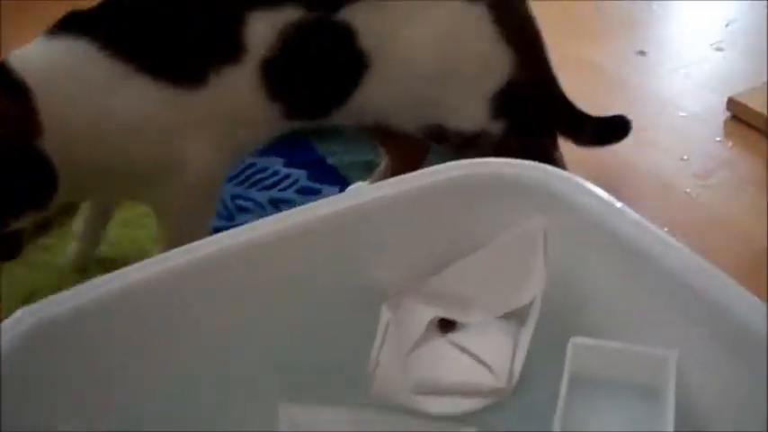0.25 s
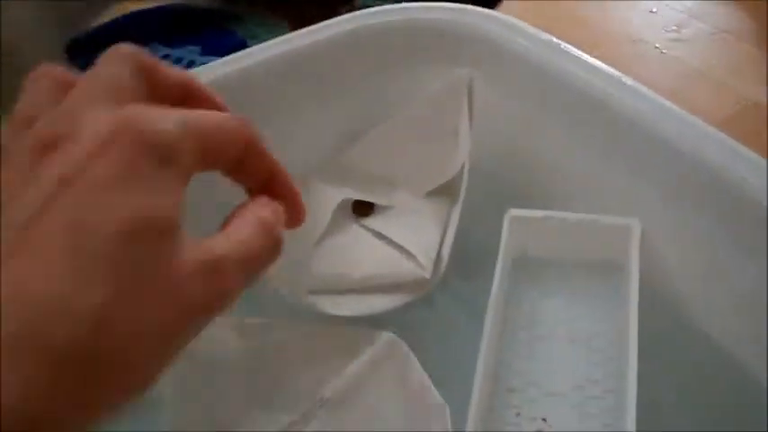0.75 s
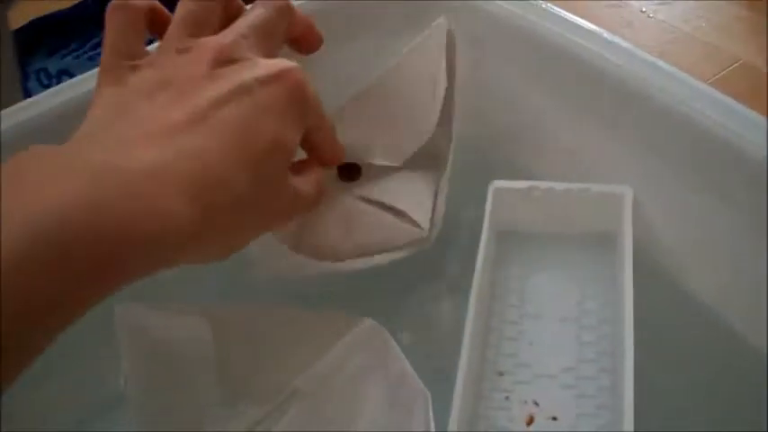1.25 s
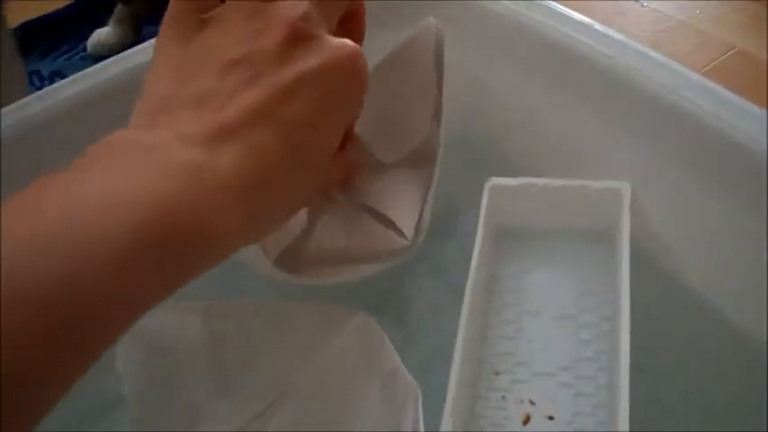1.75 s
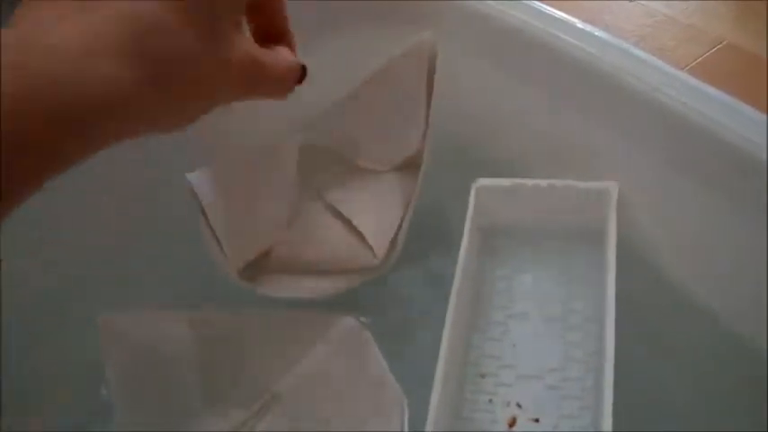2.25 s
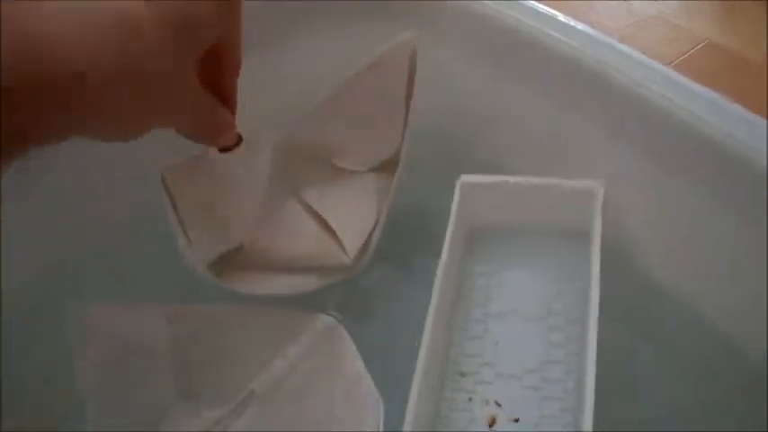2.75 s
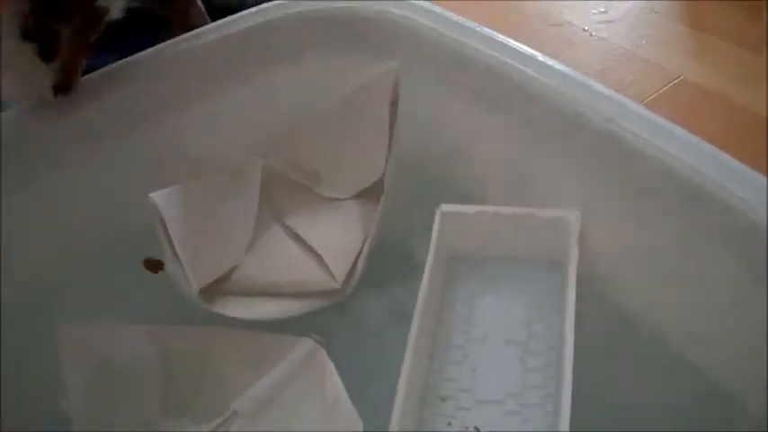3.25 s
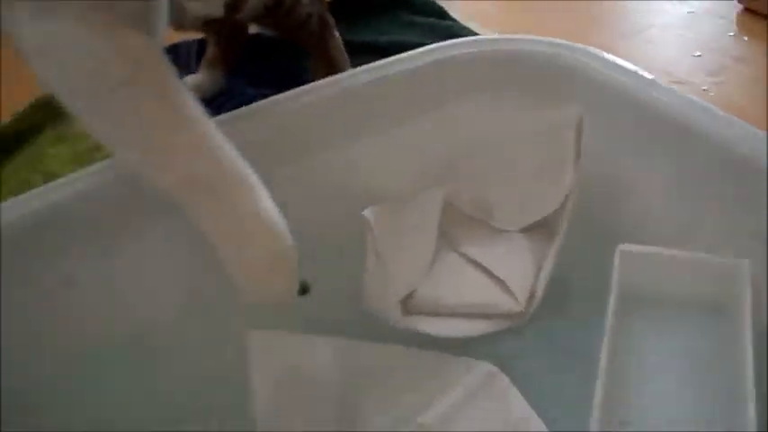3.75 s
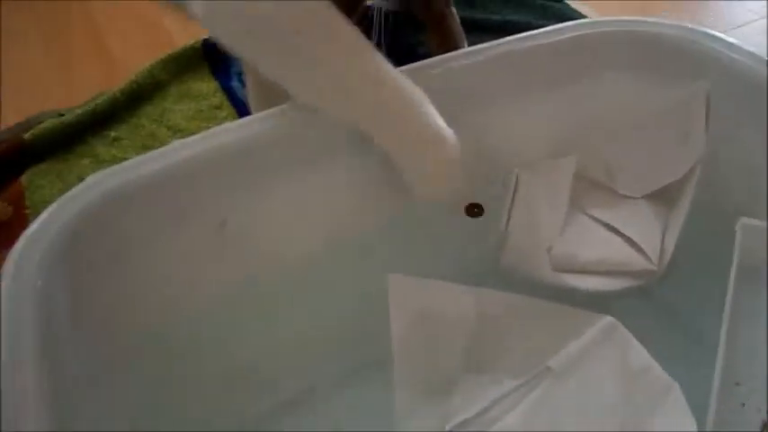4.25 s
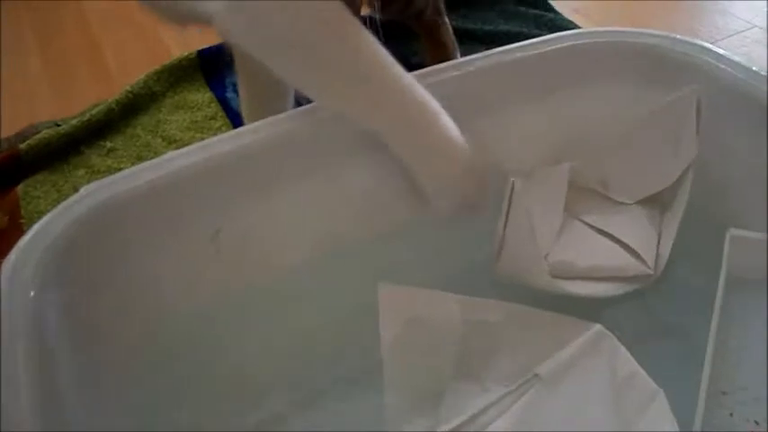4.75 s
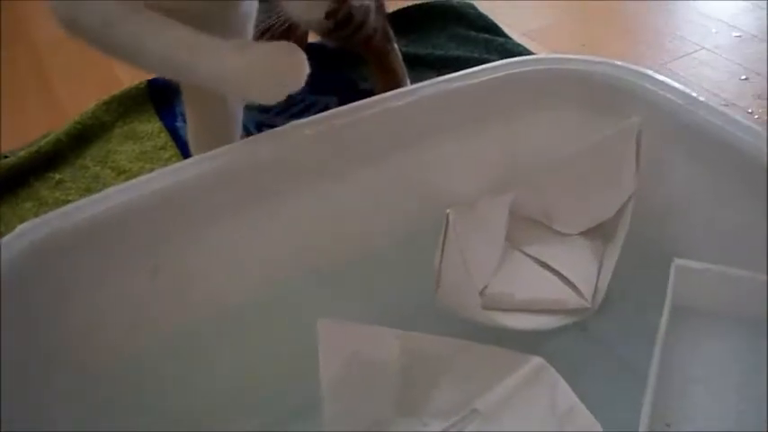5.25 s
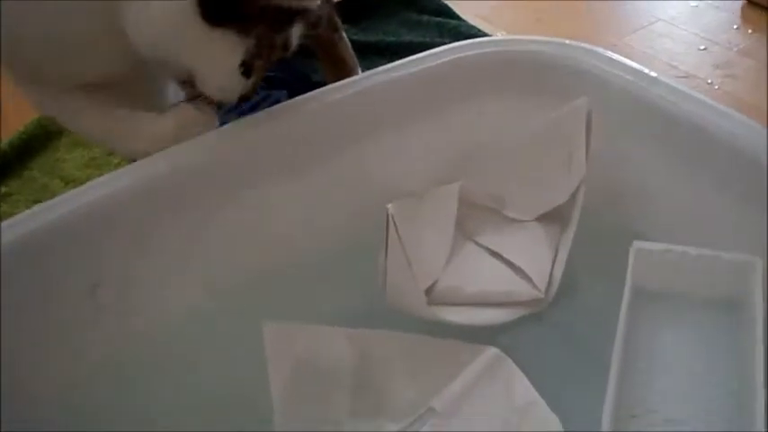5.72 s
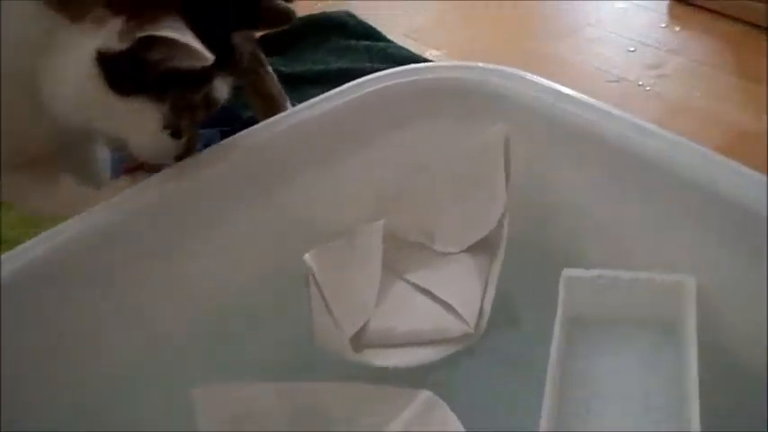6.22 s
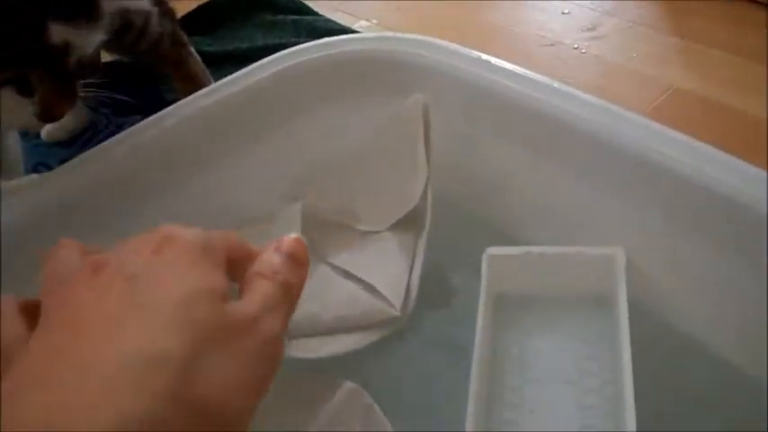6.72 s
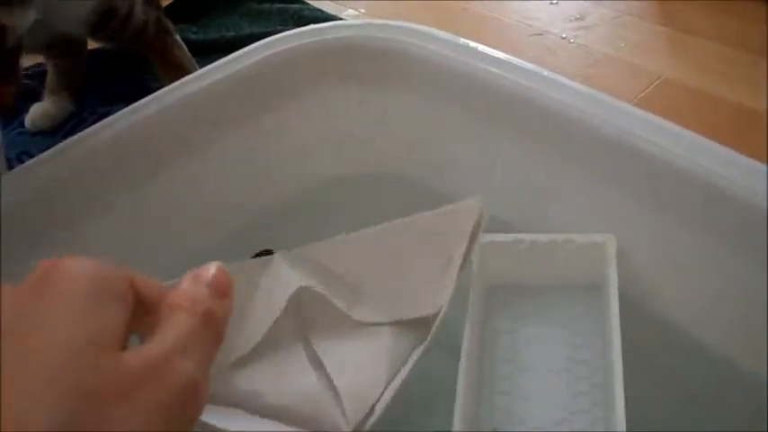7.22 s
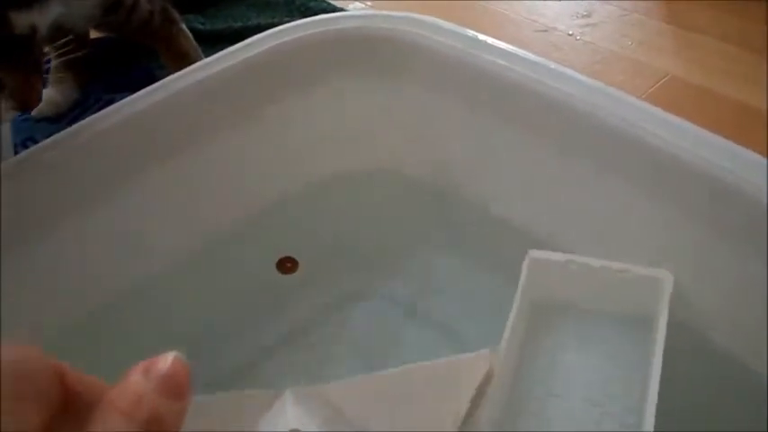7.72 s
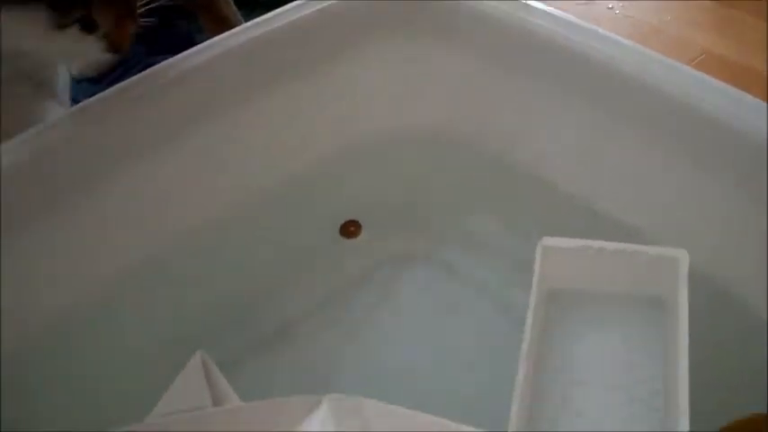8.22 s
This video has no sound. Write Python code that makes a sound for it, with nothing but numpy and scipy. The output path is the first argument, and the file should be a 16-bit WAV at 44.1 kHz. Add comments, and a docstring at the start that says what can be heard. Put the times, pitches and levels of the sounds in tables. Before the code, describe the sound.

A steady low hum and soft ventilation hiss fill a quiet room throughout. From about 0.4 seconds, fingers softly rustle a folded paper boat, with crisp crease snaps loudest between 1 and 1.6 seconds, ending around 2.3. A single sharp click comes at 3.1. From 4 to 5.3 seconds a cat paws at a plastic tub of water: irregular claw clicks, dull thuds of the wall with a slight low boom, and soft scrapes of wet pads on plastic. The loudest hits fall at 4.7 and 4.9 seconds, the first briefly overloading the microphone. Faint dry ticks follow from 5.6 to 6.3, then a sharp tap at 6.6. Light paper rustling returns at 6.7, and from 7.4 to about 8.1 the damp boat is dragged away, rubbing with a few small snaps, leaving the hum.

```python
"""A cat's paw fishes a treat out of a plastic tub of water: claws click on the wall, the wall thuds, the
water booms, and wet pads scrape along the plastic, all through the tub's own modes. A hand rustles a
folded paper boat before and drags it away after: tiny slips and snapping creases ring its folds and hull.
Around the pawing are other small taps and faint dry ticks, over the steady hum of a quiet room.
The loudest claws overload the microphone."""
import sys
import numpy as np
from scipy import signal
from scipy.fft import rfft, irfft
from scipy.io import wavfile
from scipy.ndimage import uniform_filter1d

SR = 44100
rng = np.random.default_rng(int(sys.argv[2]) if len(sys.argv) > 2 else 0)


def unload_wav(signal):
    """Save mono or channel-first audio to the path in sys.argv[1] as 16-bit WAV at rate SR, clipped to [-1, 1]."""
    wavfile.write(
        sys.argv[1],
        SR,
        np.round(np.clip(np.atleast_2d(signal).T, -1, 1) * 32767).astype(np.int16),
    )


N = 373894


def gain_of(db):
    return 10 ** (np.asarray(db) / 20)


def unit_rms(x):
    return x / np.sqrt(np.mean(x ** 2) + 1e-20)


def curve_at(points, hz):
    """Reads an EQ curve on a log frequency axis."""
    point_hz, db = np.transpose(points)
    return np.interp(np.log(hz + 1), np.log(point_hz + 1), db)


def add(mix, start_s, sound):
    part = mix[round(start_s * SR):][:len(sound)]
    part += sound[:len(part)]


def resonate(x, hz, width):
    """A resonance of gain 1: shifts hz down to zero, smooths, and shifts back."""
    carrier = np.exp(2j * np.pi * hz * np.arange(len(x)) / SR)
    pole = np.exp(-np.pi * width / SR)
    return 2 * (carrier * signal.lfilter([1 - pole], [1, -pole], x / carrier)).real


def band(x, hz, width, skirt):
    """A resonance with its skirts trimmed by a second one, skirt times as wide."""
    return resonate(resonate(x, hz, width), hz, skirt * width)


def near(hz, centre_hz, octaves):
    """A bell weight: modes close to the centre are driven hardest."""
    return np.exp(-.5 * (np.log2(hz / centre_hz) / octaves) ** 2)


def wobble(shape, first, second):
    """Slow random modulation: noise smoothed over two spans of samples."""
    return unit_rms(uniform_filter1d(uniform_filter1d(rng.standard_normal(shape), first), second))


def grit(size, per_s, spread_db):
    """Friction as random slips of uneven strength."""
    kicks = rng.standard_normal(size)
    slipping = rng.random(size) < per_s / SR
    strength = gain_of(spread_db * np.minimum(rng.exponential(1, size), 4))
    return unit_rms(kicks * slipping * strength)


def stroke(length, start_db, end_db, attack_s=.0064, release_s=.017):
    """The envelope of a stroke: it sets in, drifts evenly in level and lets go."""
    t = np.arange(0, length, 1 / SR)
    edges = np.minimum(1, np.minimum(t / attack_s, (length - t) / release_s))
    return edges * gain_of(start_db + (end_db - start_db) * t / length)


# ventilation bed: (frequency [Hz], relative level [dB])
AIR_SPECTRUM = [(5, -49), (25, -50.5), (60, -57), (160, -63), (400, -67.5), (800, -70), (1500, -73),
                (2500, -79.5), (5000, -83), (7000, -85), (8000, -87.5), (8500, -91.5), (8900, -112),
                (9500, -130)]
# motor drone: (frequency [Hz], width [Hz], level [dB])
HUM_BANDS = [(104.5, 7.1, -49), (121.3, 8.2, -47), (186.4, 9.4, -53), (244.2, 8.8, -52),
             (259.2, 19.4, -45.5), (299.6, 9.1, -52.5), (359.3, 6.3, -63.5), (588, 7.5, -56.5),
             (924, 67, -56), (1815, 81, -62.5)]


def room_tone():
    """Ventilation air with faint drifting patches, and the wavering hum of a motor."""
    hz = np.fft.rfftfreq(2048, 1 / SR)
    real, imag, patches = rng.standard_normal((N // 512 + 5, len(hz), 3)).T
    patches = unit_rms(uniform_filter1d(uniform_filter1d(patches, 20, axis=0), 6, axis=1))
    air_db = curve_at(AIR_SPECTRUM, hz)[:, None] + 1.31 * patches - 3.5
    spectra = (real + 1j * imag) * gain_of(air_db) * np.sqrt(SR / 2048)
    air = signal.istft(spectra, nperseg=2048, noverlap=1536)[1][:N]
    noise = rng.standard_normal(N)
    hum = sum(gain_of(db) * unit_rms(band(noise, f, width, skirt=2)) for f, width, db in HUM_BANDS)
    return air + hum


# faint dry ticks: (time [s], peak level [dB], pitch [Hz])
DRY_TICKS = [(0.173, -22, 5130), (5.5994, -31, 2880), (5.776, -30, 2380), (5.9787, -28, 3400),
             (6.0273, -31, 2230), (6.0517, -27, 2800), (6.105, -33.5, 6000), (6.1474, -33, 3700),
             (6.2244, -36, 3240), (6.2868, -28, 3780)]


def tick(db, hz):
    """A tiny crack: a few cycles at one pitch over a spread of noise."""
    t = np.arange(300) / SR
    crack = resonate(rng.standard_normal(len(t)), hz=4000, width=4000)
    envelope = gain_of(-60 * t / .0065) * (1 - np.exp(-t / .0003))
    sound = (np.sin(2 * np.pi * hz * t) + crack) * envelope
    return gain_of(db) * sound / abs(sound).max()


# resonances of the folded paper: (frequency [Hz], width [Hz], gain [dB])
PAPER_FOLDS = [(2170, 1080, 0), (3305, 850, -5.5), (3990, 1060, -10), (4820, 1130, -3.5), (5800, 560, 0),
               (6580, 800, -4), (7160, 600, -8), (8690, 950, 5)]


def paper(slips, bright_hz, folds, flex_db):
    """The folded sheet colours whatever shakes it; each fold flexes, so its ring comes and goes."""
    flex = wobble((len(folds), len(slips)), 900, 500)
    drives = gain_of(flex_db * np.clip(flex, -2, 1.5))
    rings = sum(gain_of(db) * band(slips * drive, hz, width, skirt=3) * (near(hz, bright_hz, .45) + .3)
                for (hz, width, db), drive in zip(folds, drives))
    fizz = .058 * np.gradient(slips)
    return rings + fizz


# the boat's hollow body: (frequency [Hz], width [Hz], gain [dB])
HULL_MODES = [(790, 130, -5), (1110, 130, 0)]


def hull(slips):
    """The air in the hull rings low."""
    return sum(gain_of(db) * band(slips, hz, width, skirt=2.5) for hz, width, db in HULL_MODES)


# fingers rubbing paper:
# (time [s], length [s], start level [dB], end level [dB], brightness [Hz], hull against paper [dB])
FINGER_RUBS = [(0.38, 0.088, -48.5, -44, 2700, -9), (0.52, 0.14, -45, -47.5, 3360, -7),
               (0.985, .05, -34, -52, 4770, -8), (1.055, 0.08, -43, -59, 3480, -6),
               (1.17, 0.14, -44, -40.5, 4160, -9.5), (1.32, .085, -39, -32, 5600, -27),
               (1.4, .05, -42, -46, 5400, -12), (1.44, 0.046, -49, -27, 4800, -15),
               (1.485, 0.073, -24, -45, 4470, -12), (1.53, 0.089, -30, -31, 4600, -15.5),
               (1.615, 0.12, -32.5, -37.5, 3900, -24), (1.735, 0.14, -40, -50, 4000, -13),
               (1.88, .18, -49.5, -45.5, 3400, -8), (2.11, 0.14, -37.5, -44.5, 4000, -16),
               (6.742, .04, -40, -62, 2600, -1), (6.81, 0.2, -48.5, -50, 4200, -11),
               (6.995, 0.081, -42, -40, 2870, -18), (7.07, .12, -44, -42.5, 4040, -12),
               (7.25, 0.058, -48, -42.5, 3900, -10)]


def rustle(length, start_db, end_db, bright_hz, hull_db, folds=PAPER_FOLDS, flex_db=4):
    """Dense slips in uneven clumps play through the folds and the hollow hull."""
    envelope = stroke(length, start_db, end_db)
    clumps = gain_of(1.6 * wobble(len(envelope), 300, 200))
    slips = unit_rms(grit(len(envelope), per_s=13000, spread_db=2.5) * clumps)
    crinkle = unit_rms(paper(slips, bright_hz, folds, flex_db))
    return envelope * (crinkle + gain_of(hull_db) * unit_rms(hull(slips)))


# creases popping: (time [s], peak level [dB], brightness [Hz], decay [ms])
CREASE_SNAPS = [(0.971, -32, 3300, 2.3), (0.9802, -11.5, 5750, 3.3), (1.3405, -35, 6240, 2.8),
                (1.389, -16, 5980, 1.9), (1.4476, -25, 5890, 3.0), (1.4872, -5.5, 5800, 1.9),
                (1.4915, -5.5, 4570, 4.3), (1.5612, -23, 5950, 3.7), (1.606, -19, 3400, 5.2),
                (1.6136, -4.5, 4120, 4.1), (1.7389, -29.5, 1900, 4.4), (1.7946, -24, 5200, 4.4),
                (2.162, -18, 4800, 12), (2.2246, -28, 1830, 1.1), (6.978, -23.5, 5260, 2.7),
                (7.4695, -19.5, 4800, 3.2), (7.5577, -28, 2960, 3.0), (7.885, -27.5, 5090, 5.3),
                (7.981, -21.5, 4670, 3.3)]
SNAP_LEAD = 600  # samples of strain before the crease gives


def snap(db, bright_hz, decay_ms, strain_ms=1.3, hull_db=-12):
    """A crease strains, gives way in a clump of slips and settles."""
    ms = np.arange(-SNAP_LEAD, 1400) / SR * 1000
    strain = np.exp(np.minimum(ms / strain_ms, -ms / decay_ms))
    slips = grit(len(ms), per_s=15000, spread_db=4) * strain
    sound = paper(slips, bright_hz, PAPER_FOLDS, flex_db=4) + gain_of(hull_db) * hull(slips)
    return gain_of(db) * sound / abs(sound).max()


# modes of the filled tub: (frequency [Hz], gain [dB], time to fall 60 dB [s])
TUB_MODES = [(76.4, 0.5, 0.065), (163, -7, 0.08), (362, -10, 0.14), (449, 0, 0.06), (581, -8.5, 0.033),
             (714, 2, 0.038), (874, 0, 0.022), (1236, 3.5, 0.024), (1313, -5, 0.012), (1640, -7.5, 0.02),
             (2125, -3.5, 0.0069), (2400, -11.5, .013), (2775, -12.5, 0.016), (3040, -8, .01),
             (3750, 4, 0.0036), (4700, -4.5, 0.0081), (5000, -4, 0.0096), (5500, 3.5, 0.002),
             (6880, -31, 0.023), (6900, -41, .008), (8060, -18, 0.0031)]
WALL_HZ, WATER_HZ = 1300, 250  # below these the whole wall bends, then the water moves with it
# sharp clicks with a low thud: claws on the tub during the pawing, other small taps and paper clicks
# around it: (time [s], click peak [dB], brightness [Hz], thud peak [dB], thud centre [Hz],
# contact [ms], click spread [octaves])
TAPS_AND_KNOCKS = [(1.1742, -36, 2090, -20, 520, 2.5, .4), (1.3574, -35, 6000, -26.5, 700, 2.5, .4),
                   (2.5676, -45, 2040, -37, 732, 2.5, .4), (2.595, -50, 2180, -26, 342, 2.5, .4),
                   (3.1461, -7.5, 2900, -28.5, 950, 2.47, 0.19), (4.0178, -27, 1990, -31.5, 665, 2.5, .4),
                   (4.0426, -11.5, 2010, -22.5, 700, 2.5, 0.33), (4.0497, -12, 4340, -36, 700, 6.7, 1.1),
                   (4.0924, -28, 1800, -47, 694, 3, .5), (4.1155, -21, 1800, -41, 694, 3, 0.44),
                   (4.1225, -21, 2830, -36, 700, 3.8, 0.51), (4.169, -26.5, 2330, -49, 746, 5, 0.56),
                   (4.4043, -6, 1870, -13.5, 590, .5, 0.65), (4.5444, -12, 2280, -19.5, 560, 3.2, 0.41),
                   (4.5506, -9.5, 2080, -23, 1200, 6.8, 0.36), (4.5664, -15.5, 2070, -23, 703, 2.2, 0.77),
                   (4.7209, -33, 2750, -46, 439, 2.5, .4), (4.7472, 3, 2135, -4.5, 630, 3.5, 0.25),
                   (4.8115, -23, 2100, -30, 420, 2.5, .4), (4.9188, -2, 2400, -14, 493, 1.9, 0.31),
                   (5.1392, -24.5, 1900, -32, 684, 3.9, 0.38), (5.155, -28, 2680, -33, 700, 2.5, .5),
                   (5.1974, -30, 4060, -20.5, 360, 2.5, 0.26), (5.2058, -23, 3940, -17.5, 700, 2.5, 0.58),
                   (5.2145, -15.5, 4300, -15.5, 710, 3.2, 1), (6.558, -9, 3550, -29.5, 760, 2.3, 0.14),
                   (7.3877, -40, 2380, -32.5, 800, 2.5, .4), (8.4577, -48, 2140, -31, 340, 2.5, .4)]


def knock(click_db, bright_hz, thud_db, thud_hz, contact_ms, spread):
    """A brief skipping contact: the high modes click, the middle ones thud, the lowest boom."""
    t = np.arange(16000) / SR
    hz, db, t60 = np.transpose(TUB_MODES)[:, :, None]
    # each point of contact drives the modes differently
    spot = rng.choice([-1, 1], hz.shape) * gain_of(2 * rng.standard_normal(hz.shape))
    rings = spot * gain_of(db - 60 * t / t60) * np.sin(2 * np.pi * hz * t)

    chatter = .1 * np.cos(2 * np.pi * bright_hz * t) + .33 * rng.standard_normal(len(t))
    skips = chatter * np.exp(-(1000 * t / contact_ms) ** 4)
    skips[0] = 1  # first contact
    click_drive = (hz > WALL_HZ) * (near(hz, bright_hz, spread) + .77 * spread)  # wide wakes far modes
    click = np.convolve(skips[:600], (click_drive * rings).sum(0)[:1500])

    thud_drive = (hz <= WALL_HZ) * (hz > WATER_HZ) * (near(hz, thud_hz, .32) + .63)
    thud = (thud_drive * rings).sum(0) * (1 - np.exp(-t / .00026))
    boom = ((hz <= WATER_HZ) * rings).sum(0) * (1 - np.exp(-t / .0044))
    boom_db = -27 + .4 * thud_db  # the boom grows much less than the thud

    sound = basin_wash(t, click_db, bright_hz)
    for layer, peak_db in ((click, click_db), (thud, thud_db), (boom, boom_db)):
        add(sound, 0, gain_of(peak_db) * layer / abs(layer).max())
    return sound


# tone of the reverb tail: (frequency [Hz], gain [dB])
WASH_EQ = [(300, -4), (900, -6), (2200, -9), (3500, -12), (5000, -10), (7000, -23.5), (9000, -6)]


def basin_wash(t, click_db, bright_hz):
    """A click's diffuse tail in basin and room; the treble dies first."""
    hz = np.fft.rfftfreq(len(t), 1 / SR) + 1
    colour = gain_of(curve_at(WASH_EQ, hz)) * (1 + 3.7 * near(hz, bright_hz, .39))
    echoes = unit_rms(irfft(rfft(grit(len(t), per_s=6000, spread_db=1.5)) * colour))
    dull = signal.lfilter([.3], [1, -.7], echoes)
    tail = dull * gain_of(-60 * t / .5) + (echoes - dull) * gain_of(-60 * t / .13)
    wash_db = -26.5 + .82 * click_db  # the wash grows a little less than the click
    return gain_of(wash_db) * tail * (1 - np.exp(-t / .0012))


# pads and claws sliding through water along the wall:
# (time [s], length [s], start level [dB], end level [dB], scratch against rumble [dB])
PAW_SCRAPES = [(4.063, 0.107, -48.5, -48, 7.5), (4.413, 0.038, -44.5, -48, 3), (4.564, 0.23, -38, -69, -1),
               (4.763, 0.18, -27, -64, -12), (4.931, 0.14, -41, -48, -0.5), (5.003, 0.138, -39.5, -40, -26),
               (5.127, 0.18, -41.5, -50, -10)]


def scrape(length, start_db, end_db, scratch_db, scratch_hz=2200, rumble_hz=700):
    """Stick and slip on wet plastic rings the tub's modes: a scratch on top, a rumble below."""
    envelope = stroke(length, start_db, end_db)
    slips = grit(len(envelope), per_s=2900, spread_db=-1.5)
    rings = [(hz, gain_of(db) * resonate(slips, hz, 1.4 / t60) * t60) for hz, db, t60 in TUB_MODES]
    scratch = sum(ring * (near(hz, scratch_hz, .29) + .3) for hz, ring in rings if hz > WALL_HZ)
    rumble = sum(ring * near(hz, rumble_hz, .7) for hz, ring in rings if hz <= WALL_HZ)
    return envelope * (gain_of(scratch_db) * unit_rms(scratch) + unit_rms(rumble))


# resonances of the wet paper: (frequency [Hz], width [Hz], gain [dB])
WET_FOLDS = [(2010, 480, 1), (2970, 330, 2), (3560, 150, -2), (4160, 430, -4.5), (4890, 470, -1),
             (5260, 270, -3), (6270, 740, -1), (7150, 450, -13), (9240, 540, 8)]
# pulls on the boat:
# (time [s], length [s], start level [dB], end level [dB], brightness [Hz], hull against paper [dB])
BOAT_DRAGS = [(7.425, 0.058, -43, -54, 4500, -2), (7.464, 0.04, -29, -36.5, 4900, 0),
              (7.495, .03, -32, -27, 4470, -5), (7.52, 0.068, -34, -28, 4300, -6.5),
              (7.578, 0.065, -37.5, -42, 4270, -4.5), (7.642, 0.21, -40, -44.5, 4200, -5.5),
              (7.815, 0.074, -34.5, -31, 4150, -9), (7.875, 0.0414, -27, -27, 4400, -12),
              (7.91, .065, -41.5, -58, 4200, -4), (7.978, 0.1, -36, -45.5, 4300, -8.5)]


def drag(*pull):
    """The boat rubs against its neighbour: a rustle through wet folds that flex less."""
    return rustle(*pull, folds=WET_FOLDS, flex_db=2.5)


# microphone tone, on top of the levels of every cue: (frequency [Hz], gain [dB])
MICROPHONE_EQ = [(20, 9), (6000, 1), (7800, 0), (8600, -10.5), (9500, -24.5)]


def scene():
    """Tub, paper, taps and ticks, coloured by the microphone and laid over the room tone in mono."""
    foley = np.zeros(N)
    tracks = ((TAPS_AND_KNOCKS, knock, 0), (CREASE_SNAPS, snap, SNAP_LEAD / SR), (DRY_TICKS, tick, 0),
              (FINGER_RUBS, rustle, 0), (BOAT_DRAGS, drag, 0), (PAW_SCRAPES, scrape, 0))
    for cues, source, lead_s in tracks:
        for time_s, *settings in cues:
            add(foley, time_s - lead_s, source(*settings))
    response = gain_of(curve_at(MICROPHONE_EQ, np.fft.rfftfreq(N, 1 / SR)))
    return (irfft(rfft(foley) * response, N) + room_tone())[None]


def record(dry):
    """The converter sits off centre and clips at full scale; a steep low-pass takes off the top."""
    offset, cutoff_hz = -.054, 9555
    clipped = np.clip(dry + offset, -1, 1)
    return signal.sosfiltfilt(signal.butter(16, cutoff_hz, fs=SR, output="sos"), clipped)


dry = scene()
out = record(dry)
unload_wav(out)
```